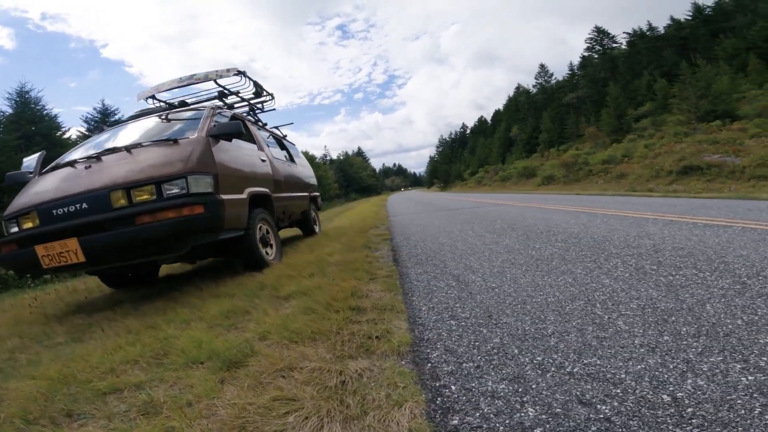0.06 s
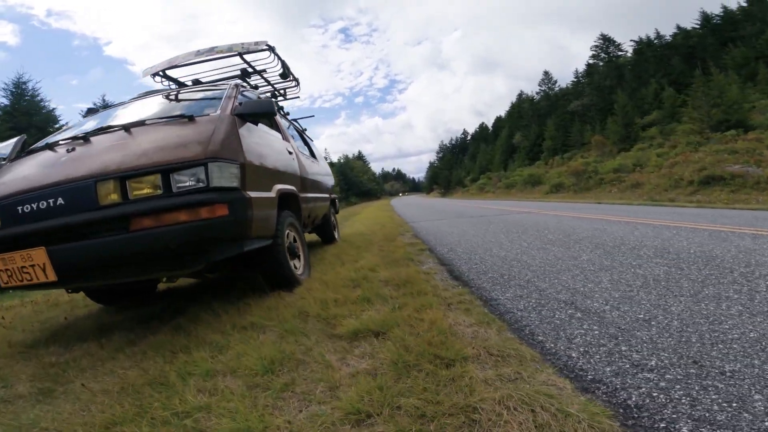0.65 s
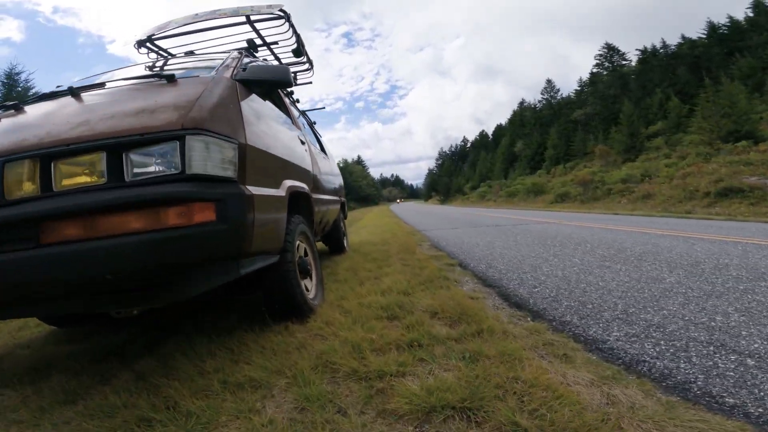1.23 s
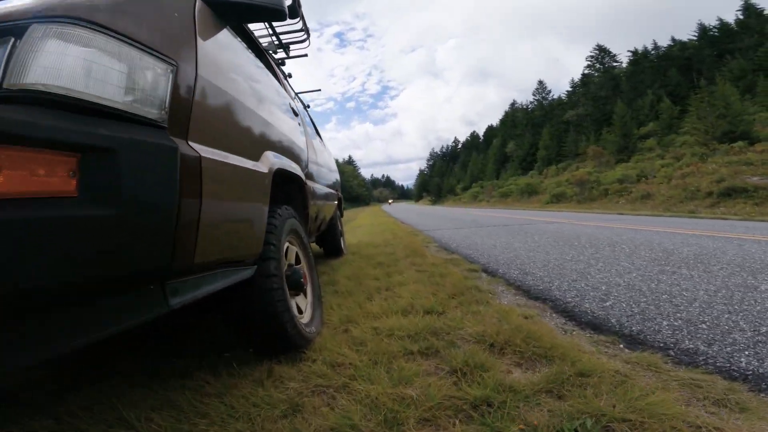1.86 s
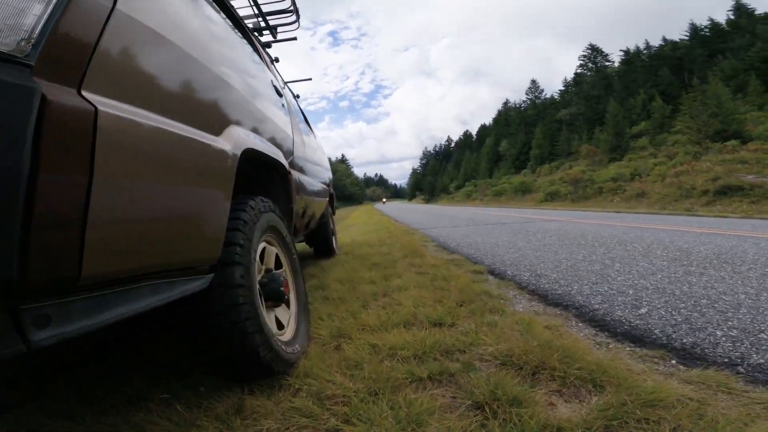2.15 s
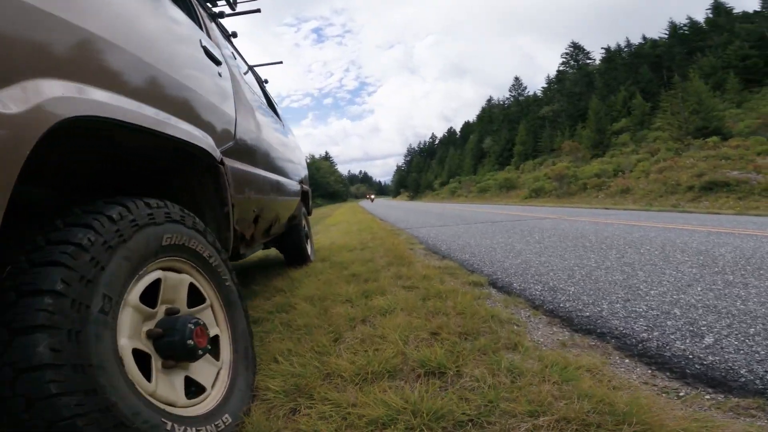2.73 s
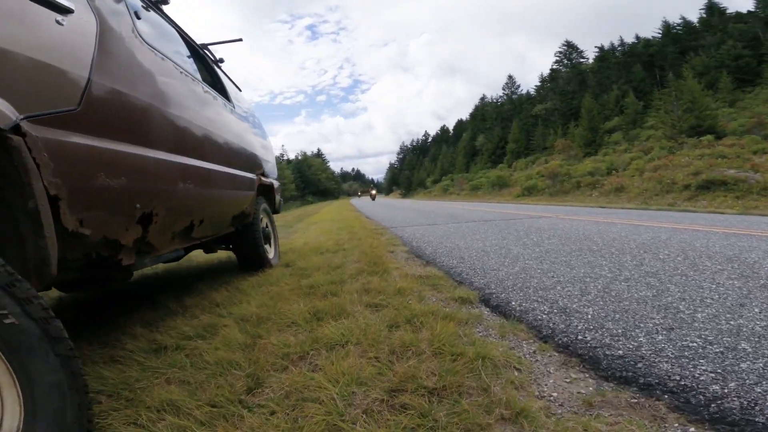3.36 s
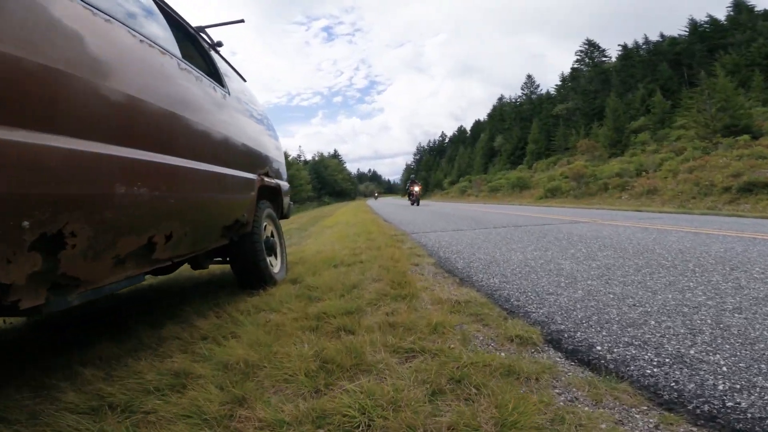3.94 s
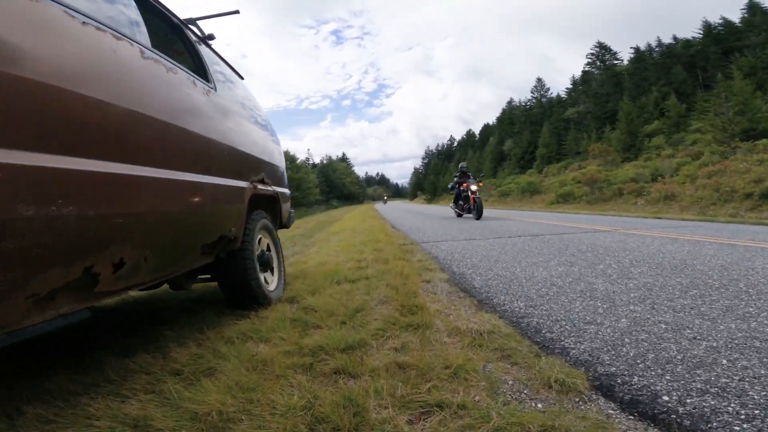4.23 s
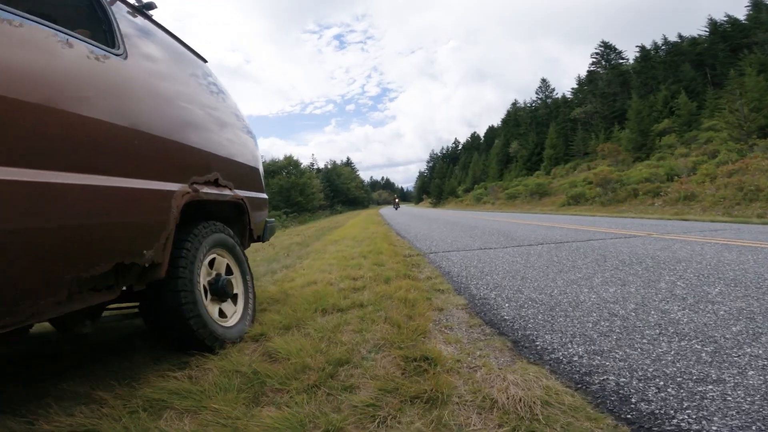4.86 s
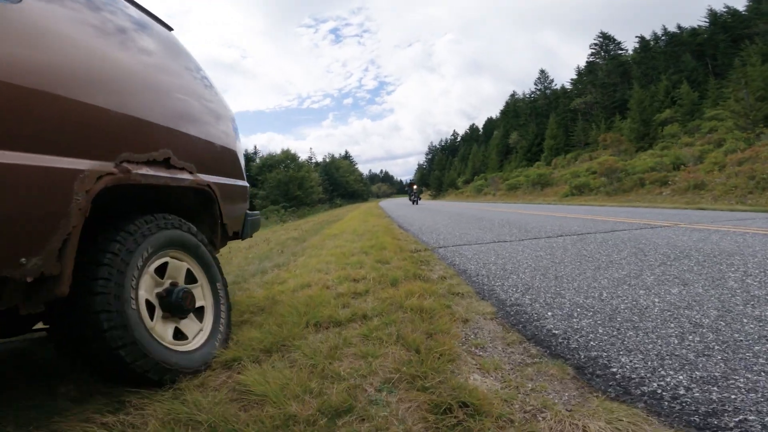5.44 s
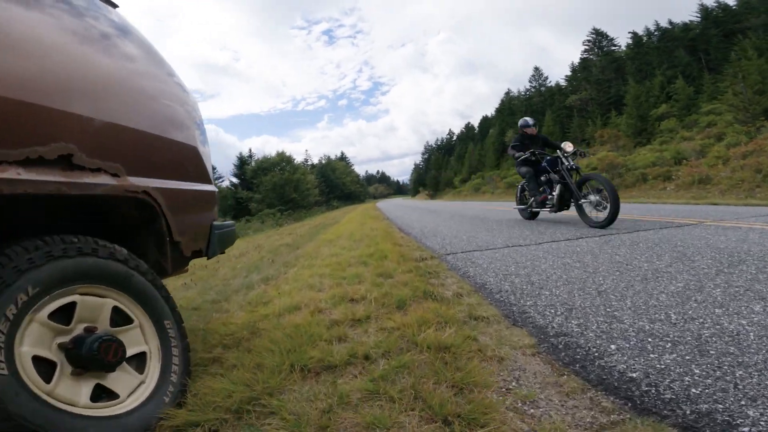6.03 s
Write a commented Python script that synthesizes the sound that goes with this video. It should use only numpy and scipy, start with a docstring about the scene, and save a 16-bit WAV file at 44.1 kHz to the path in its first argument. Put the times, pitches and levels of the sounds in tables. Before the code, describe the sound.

Soft wind buffets a microphone beside an open road, under the low, uneven hum of an approaching motorcycle. The engine swells and passes very close in a burst of exhaust, rushing air and tyre hiss, then falls in pitch and recedes. Right after, another motorcycle draws near, its steady throbbing beat growing into a gritty rasp that is still building at the end.

```python
"""A distant twin-cylinder motorcycle drones with an uneven beat while a dying breeze rumbles on the
microphone and stirs the grass. The bike nears, barks and whooshes past at 4.7 s, its pitch falling, its
exhaust echoing off a parked van. A second twin, with an even, rasping beat, is almost there at the end.
Each exhaust fires twice an engine cycle: the pipe rings, the pressure steps give overtones and the
turbulent gas gives grit. Tyres hiss and air roars as the bikes come close."""
import sys
import numpy as np
from scipy import signal
from scipy.fft import rfft, irfft
from scipy.io import wavfile
from scipy.ndimage import uniform_filter1d, minimum_filter1d, map_coordinates

SR = 44100
rng = np.random.default_rng(int(sys.argv[2]) if len(sys.argv) > 2 else 0)


def wrap_up_sound(samples):
    """Save the sound to the file named by the first command line argument, as 16-bit audio."""
    columns = np.atleast_2d(samples).T
    # keep every value between -1 and 1, then stretch to whole-number steps
    tamed = np.clip(columns, -1, 1)
    steps = np.round(tamed * 32767).astype(np.int16)
    wavfile.write(sys.argv[1], SR, steps)


N = 272979
T = np.arange(N) / SR
HZ = np.fft.rfftfreq(N, 1 / SR)
SOUND_M_PER_S = 343
PASS_S, SPEED_M_PER_S, CLOSEST_M = 4.71, 22.2, 1.9  # first bike's straight pass


def amp(db):
    """Decibels to gain."""
    return 10 ** (np.asarray(db) / 20)


def unit(x):
    """Scale to rms 1."""
    return x / np.sqrt(np.mean(abs(x) ** 2) + 1e-20)


def curve(rows):
    """Time table at every sample."""
    return np.interp(T, *np.transpose(rows))


def swell(at_s, sigma_s):
    """Gaussian rise and fall, peak 1."""
    return np.exp(-((T - at_s) / sigma_s) ** 2 / 2)


def spectrum(rows):
    """Frequency table at every FFT bin."""
    hz, value = np.transpose(rows)
    return np.interp(np.log(HZ + 1), np.log(hz + 1), value)


def colour(x, rows):
    """Filter by a spectrum table, rms 1."""
    return unit(irfft(rfft(x) * amp(spectrum(rows)), N))


def wander(rate_hz):
    """Random drift below rate_hz, rms 1."""
    return unit(irfft(rfft(rng.standard_normal(N)) / (1 + (HZ / rate_hz) ** 4), N))


def delayed(x, delay_s):
    """Sound path of varying length."""
    return map_coordinates(x, [(T - delay_s) * SR], order=3, mode="nearest")


def resonate(x, hz, width_hz):
    """Resonance of gain about 1 at hz, which may be a curve."""
    carrier = np.exp(2j * np.pi * np.cumsum(hz * np.ones(N)) / SR)
    pole = np.exp(-np.pi * width_hz / SR)
    return 2 * (carrier * signal.lfilter([1 - pole], [1, -pole], x / carrier)).real


def band(x, hz, width_hz):
    """Two like resonances in series, rms 1."""
    return unit(resonate(resonate(x, hz, width_hz), hz, width_hz))


# Left-right likeness: freq_hz, coherence
COHERENCE = [(20, 0.9), (60, 0.95), (130, 1), (300, 0.97), (700, 0.94), (2000, 0.79), (5000, 0.71),
             (12000, 0.45)]


def noise(rows):
    """Coloured stereo noise, less alike towards the treble, rms 1."""
    mid, side = rng.standard_normal((2, len(HZ))) + 1j * rng.standard_normal((2, len(HZ)))
    coherence = np.clip(spectrum(COHERENCE), 0, 1)
    side *= np.sqrt((1 - coherence) / (1 + coherence))
    return unit(irfft(np.array([mid + side, mid - side]) * amp(spectrum(rows)), N))


def crank(cycle_hz, fire_s):
    """Engine cycles counted from a firing of the first cylinder at fire_s."""
    cycles = np.cumsum(cycle_hz) / SR
    return cycles - np.interp(fire_s, T, cycles)


# Exhaust pipe resonances: centre_hz, width_hz
PIPE_MODES = [(78, 78), (205, 12), (375, 135)]


def drone(cycles, orders, lag_cycles):
    """Low exhaust orders, phased by two firings a cycle ringing in the pipe; each wavers slowly."""
    cycle_hz = (cycles[-1] - cycles[0]) / T[-1]
    out = np.zeros(N)
    for order, db in orders:
        hz = order * cycle_hz
        pipe = sum(1 / (1 + 1j * (hz ** 2 - centre ** 2) / (hz * width)) for centre, width in PIPE_MODES)
        firings = 1 + np.exp(-2j * np.pi * order * lag_cycles)
        phase = np.angle(pipe * firings) + .3 * np.pi  # the lead makes the pulses less peaky
        waver_db = .26 * np.interp(T * 3.74, np.arange(64), rng.standard_normal(64))
        out += amp(db + waver_db) * np.cos(2 * np.pi * order * cycles + phase)
    return unit(out)


def pressure_steps(cycles, lag_cycles, second_db, scatter):
    """Two valve openings a cycle, each trailed by brief scatter from pipe and road."""
    cycle_s = T[-1] / (cycles[-1] - cycles[0])
    steps = np.zeros(N)
    for start, db in ((0, 0), (lag_cycles, second_db)):
        offset_samples = ((cycles - start + .5) % 1 - .5) * cycle_s * SR
        steps += amp(db) * np.exp(-offset_samples ** 2)
    response = rng.standard_normal(SR // 40) * np.exp(-T[:SR // 40] / .0055)
    response *= scatter / np.linalg.norm(response)
    response[0] += 1  # direct path
    return signal.oaconvolve(steps, response)[:N]


def gas_flow(cycles, lag_cycles, second_db, decay_cycles, uneven_db):
    """Each exhaust valve opens abruptly and the flow dies away; firings vary in strength."""
    flow = np.zeros(N)
    for start, db in ((0, 0), (lag_cycles, second_db)):
        cycle, age = np.divmod(cycles - start, 1)
        strength = amp(db + uneven_db * rng.standard_normal(N // 100))
        flow += strength[cycle.astype(int)] * np.exp(-age / decay_cycles)
    return unit(uniform_filter1d(uniform_filter1d(flow, size=45), size=35))


def passing(ahead_m, db, reach_m, coming_db, going_db, rear_db, beam):
    """Gain of a directional source; beyond reach_m it loses coming_db or going_db per doubled range."""
    distance_m = np.hypot(ahead_m, CLOSEST_M)
    rear = ((1 - ahead_m / distance_m) / 2) ** beam
    doublings = np.log2(np.hypot(1, distance_m / reach_m))
    return amp(db - (1 - rear) * coming_db * doublings + rear * (rear_db - going_db * doublings))


# Engine speed, throttle opening a little: time_s, cycle_hz
FIRST_REVS = [(0, 33.84), (3.1, 33.84), (4.15, 34.04), (6.19, 34.1)]
# Drone from the front and from behind: order, relative_db
FRONT_ORDERS = [(1, -22), (2, 1), (3, -4), (4, -13.5), (5, 3.5), (6, 5), (7, -9.5), (8, -3), (9, -12.5),
                (10, 0), (11, -2), (12, -44.5), (13, -11), (14, -12), (15, -17.5), (16, -13)]
REAR_ORDERS = [(1, -21.5), (2, -5.5), (3, -3), (4, -16.5), (5, -0.5), (6, 0.5), (7, -9), (8, -3.5),
               (9, -15), (10, -2), (11, -7), (12, -29), (13, -38), (14, -33.5), (15, -27), (16, -11.5),
               (17, -31.5), (18, -17), (19, -25.5)]
# Spectra of exhaust bark, close exhaust blast, tyre hiss and rushing air: freq_hz, density_db
BARK_SPECTRUM = [(330, -17.5), (450, 3), (560, 4), (760, 6), (850, 2.5), (1050, 1.5), (1500, -1),
                 (2100, -7.5), (3000, -19), (6000, -32.5), (14000, -63)]
BLAST_SPECTRUM = [(200, -21.5), (320, 6.5), (520, 6.5), (720, -1.5), (1000, -13), (1500, -30.5),
                  (3000, -47.5)]
TYRE_SPECTRUM = [(750, -25), (1100, 3.5), (1650, 1.5), (2300, -6), (3400, -6), (4700, -2.5), (7500, -10.5),
                 (9000, -18), (12200, -26.5), (15500, -45)]
AIR_SPECTRUM = [(100, -0.5), (450, 4), (700, -1), (1300, -10.5), (2500, -15.5), (3300, -19), (4800, -22.5),
                (7500, -35), (9000, -44.5), (12200, -49.5), (15000, -66)]


def first_bike():
    """Uneven twin passing with Doppler shift: mellow drone far off; bark, blast and hiss close by."""
    ahead_m = SPEED_M_PER_S * (PASS_S - T)
    bearing = np.arctan2(CLOSEST_M, ahead_m)
    behind, abreast = (1 - np.cos(bearing)) / 2, np.sin(bearing)
    doppler = 1 + SPEED_M_PER_S / SOUND_M_PER_S * np.cos(bearing)
    lag_cycles, silencer_back_m = .38, .99
    cycles = crank(curve(FIRST_REVS) * doppler, fire_s=3.6675) + .0016 * wander(14)

    bass_cycles = cycles - .08  # the bass leaves the silencer after the crack
    bass = (1 - behind) * drone(bass_cycles, FRONT_ORDERS, lag_cycles)
    bass += behind * drone(bass_cycles, REAR_ORDERS, lag_cycles)
    bass *= passing(ahead_m, db=-11.5, reach_m=8, coming_db=2.5, going_db=3.5, rear_db=-4.5, beam=1)
    bass *= amp(.55 * wander(25) + .45 * wander(3))
    # Side-on, the drone swells into a honk near 280 Hz.
    side_on = np.sin(np.arctan2(CLOSEST_M, ahead_m + silencer_back_m))
    bass += amp(3.5) * side_on ** 1.4 * resonate(bass, hz=280, width_hz=150)

    steps = pressure_steps(cycles, lag_cycles, second_db=1, scatter=.35)
    flow = gas_flow(cycles, lag_cycles, second_db=1, decay_cycles=.12, uneven_db=1)
    bark = .86 * colour(steps, BARK_SPECTRUM) + .46 * noise(BARK_SPECTRUM) * unit(2.2 + flow)
    bark *= passing(ahead_m, db=-28, reach_m=11.5, coming_db=9, going_db=30, rear_db=-6, beam=.85)
    blast = .95 * colour(steps, BLAST_SPECTRUM) + .3 * noise(BLAST_SPECTRUM) * unit(.4 + flow)
    blast *= passing(ahead_m, db=-22.5, reach_m=5.7, coming_db=16, going_db=21, rear_db=3.5, beam=1.3)
    exhaust = np.array([van_echo(channel, abreast) for channel in bass + bark + blast])

    hiss = noise(TYRE_SPECTRUM) * unit(4 + flow) * amp(wander(32))
    hiss *= passing(ahead_m, db=-37, reach_m=7.06, coming_db=6.5, going_db=7.5, rear_db=-12.5, beam=13)
    roar = noise(AIR_SPECTRUM)
    roar *= passing(ahead_m, db=-28.5, reach_m=14.2, coming_db=10.5, going_db=11, rear_db=-7.5, beam=.26)

    # Once the bike is behind, the left is slightly later and louder.
    left, right = exhaust + hiss + roar
    stereo = np.array([delayed(left, .00012 * behind), right])
    pan_db = behind * np.array([[.62], [-.62]])
    return (stereo + whirr()) * amp(pan_db)


def van_echo(exhaust, abreast, max_path_m=1.2):
    """The van's side reflects the exhaust, latest when abreast: a comb slides down, then up."""
    highpass = signal.butter(3, 286, "highpass", fs=SR, output="sos")
    reflected = signal.sosfiltfilt(highpass, exhaust)
    delay_s = max_path_m * abreast ** .8 / SOUND_M_PER_S
    return exhaust + .47 * abreast ** .3 * delayed(reflected, delay_s)


# Gusts on the microphone: peak_s, sigma_s, level_db
MIC_GUSTS = [(0.67, 0.07, -27.5), (.96, 0.087, -33), (2.705, 0.023, -25)]
# Low air rumble: freq_hz, density_db
RUMBLE_SPECTRUM = [(10, -16.5), (25, 16.5), (48, 12), (75, 15.5), (130, 10.5), (250, 4.5), (450, -18),
                   (900, -62.5)]


def breeze(start_db=-25, fall_db_per_s=2.6):
    """A dying breeze and brief gusts buffet the microphone."""
    steady = amp(start_db - fall_db_per_s * T)
    gusts = sum(amp(db) * swell(peak_s, sigma_s) for peak_s, sigma_s, db in MIC_GUSTS)
    return noise(RUMBLE_SPECTRUM) * (steady + gusts) * amp(2 * wander(4.3))


def distant_wash(start_db=-36.5, fall_db_per_s=.8):
    """Far road and forest noise, slowly dying down."""
    return noise(AIR_SPECTRUM) * amp(start_db - fall_db_per_s * T + .74 * wander(7.6))


# Soft swishes in the verge: peak_s, sigma_s, level_db, centre_hz, width_hz
VERGE_SWISHES = [(0.245, 0.27, -40.5, 1130, 1000), (0.599, 0.93, -40, 613, 696),
                 (1.008, 0.22, -43, 2520, 3450), (1.471, 0.48, -42.5, 1233, 1007)]
# Grass rustles: peak_s, level_db
GRASS_RUSTLES = [(0.168, -60.5), (0.559, -58.5), (0.799, -59), (1.182, -57.5), (1.37, -58.5),
                 (1.741, -55.5), (2.43, -60.5), (3, -67.5), (5.13, -57)]
# Rustle spectrum: freq_hz, density_db
GRASS_SPECTRUM = [(1500, -37), (4000, 16), (7000, 7), (9000, -7.5), (12200, 1.5), (15000, -16)]


def grass():
    """Soft swishes of wind in the verge; faint high rustles with a fast random flutter in level."""
    flutter = unit(amp(4.8 * wander(350)))
    stirring = sum(amp(db) * swell(peak_s, sigma_s=.068) for peak_s, db in GRASS_RUSTLES)
    rustle = noise(GRASS_SPECTRUM) * flutter * stirring
    air = noise(AIR_SPECTRUM)
    swish = sum(band(air, hz, width_hz) * amp(db) * swell(peak_s, sigma_s)
                for peak_s, sigma_s, db, hz, width_hz in VERGE_SWISHES)
    return rustle + swish * amp(wander(5.5))


# Engine speed: time_s, cycle_hz
SECOND_REVS = [(0, 26.75), (1.5, 26.68), (2.8, 26.55), (3.3, 26.5), (4.4, 26.13), (5, 25.9), (5.6, 25.84),
               (6.19, 25.84)]
# Throb level, long far off, then close: time_s, level_db
SECOND_APPROACH = [(0, -38), (1.5, -29.5), (2.7, -28), (4.6, -38.5), (5.25, -29.5), (5.55, -23),
                   (5.72, -19), (5.88, -16.5), (6.19, -13.5)]
# Exhaust throb: order, relative_db
THROB_ORDERS = [(1, -20), (2, -9), (3, -44), (4, 6.5), (5, 0.5), (6, 2), (7, -22.5), (8, -13), (9, -9),
                (10, -23), (11, -26.5), (12, -29), (13, -36.5), (14, -30), (15, -10), (16, -28), (17, -9)]


def second_bike():
    """Even twin with open pipes: a deep throb and rumble; rasp, roar and tyre hiss grow as it nears."""
    lag_cycles = .52
    cycles = crank(curve(SECOND_REVS), fire_s=6.1112)
    level_db = curve(SECOND_APPROACH)
    near = amp(2.3 * (level_db - level_db.max()))  # 2.3 dB per dB of throb
    throb_cycles = cycles + .04 + .004 * wander(12)  # gas bursts fall in the throb's troughs
    throb = drone(throb_cycles, THROB_ORDERS, lag_cycles) * amp(level_db + .8 * wander(8))
    rasp = pipe_rasp(cycles, lag_cycles) * amp(-25) * near
    roar = noise(AIR_SPECTRUM) * amp(-22.5) * near
    rumble = noise(RUMBLE_SPECTRUM) * amp(level_db - 17.5)
    hiss = noise(TYRE_SPECTRUM) * amp(-45) * swell(at_s=6.34, sigma_s=.79)
    return throb + roar + rumble + hiss + rasp * amp([[-.3], [.3]])


# Whirr of the first bike going by: time_s, level_db, centre_hz
WHIRR_SWEEP = [(3.9, -60, 1600), (4.35, -41.5, 1450), (4.48, -34, 1390), (4.6, -41, 1650),
               (4.72, -31, 1990), (4.795, -32, 2450), (4.86, -76, 2610)]


def whirr():
    """A bright whirr flares at the closest moment, rises in pitch and cuts off."""
    time_s, level_db, centre_hz = np.transpose(WHIRR_SWEEP)
    swept = band(noise(TYRE_SPECTRUM), np.interp(T, time_s, centre_hz), width_hz=1600)
    return swept * amp(np.interp(T, time_s, level_db))


# Open-pipe gas bursts: freq_hz, density_db
RASP_SPECTRUM = [(200, -31.5), (420, 10.5), (700, -8), (1050, 1), (1400, -3.5), (2200, -8.5), (3300, -14.5),
                 (5000, -13.5), (7300, -20.5), (9000, -27), (12200, -32.5), (15500, -56)]
# Spells of harder firing: peak_s, sigma_s, boost_db
HARD_SPELLS = [(5.87, 0.028, 2), (5.999, 0.021, 2.5), (6.105, 0.026, 2.5)]


def pipe_rasp(cycles, lag_cycles):
    """Each firing cracks and blows a burst of gas from an open pipe; the sharpest band jumps about."""
    flow = gas_flow(cycles, lag_cycles, second_db=-1.5, decay_cycles=.085, uneven_db=1.6)
    flow = unit(uniform_filter1d(flow, size=115))
    crack = colour(pressure_steps(cycles, lag_cycles, second_db=-1.5, scatter=.77), RASP_SPECTRUM)
    grit = noise(RASP_SPECTRUM) * unit(.48 + flow) * amp(1.5 * wander(400))
    rasp = .3 * crack + .95 * grit
    snarl_hz = 3500 * 2 ** (.6 * np.tanh(wander(30)))
    rasp += .8 * resonate(rasp, snarl_hz, width_hz=1400)
    boost_db = sum(db * swell(peak_s, sigma_s) for peak_s, sigma_s, db in HARD_SPELLS)
    return rasp * amp(boost_db)


def scene():
    """Two bikes on a breezy country road."""
    return first_bike() + second_bike() + breeze() + grass() + distant_wash()


def record(dry, ceiling_db=-2.8, cutoff_hz=15650):
    """Peak limiter, then low-pass."""
    gain = np.minimum(1, amp(ceiling_db) / (abs(dry).max(0) + 1e-9))
    gain = uniform_filter1d(minimum_filter1d(gain, size=900), size=900)
    lowpass = signal.firwin(511, cutoff_hz, window=("kaiser", 9), fs=SR)
    return signal.oaconvolve(dry * gain, lowpass[None], "same")


dry = scene()
out = record(dry)
wrap_up_sound(out)
```